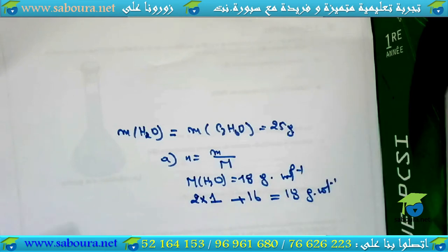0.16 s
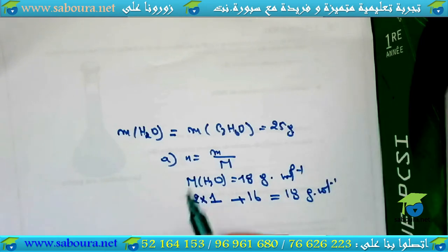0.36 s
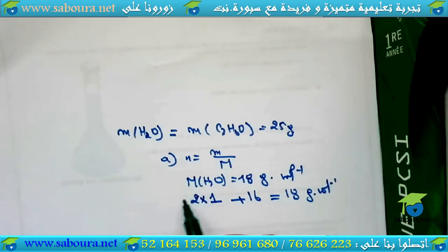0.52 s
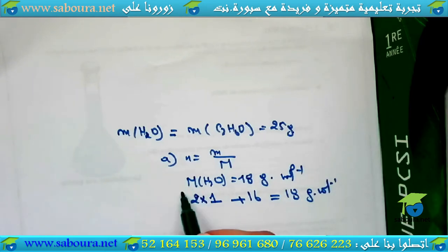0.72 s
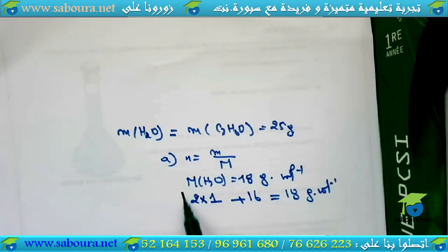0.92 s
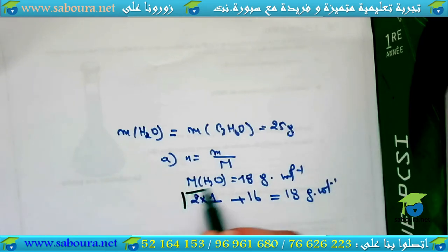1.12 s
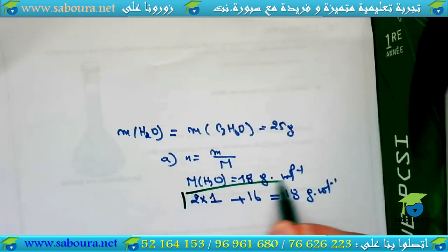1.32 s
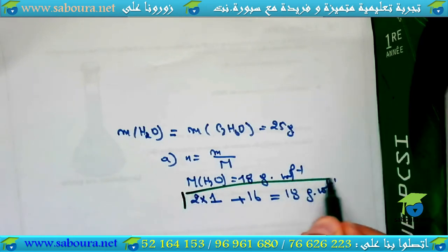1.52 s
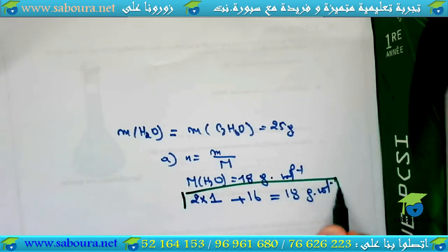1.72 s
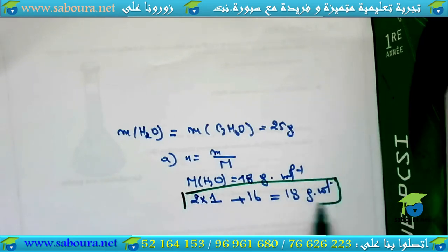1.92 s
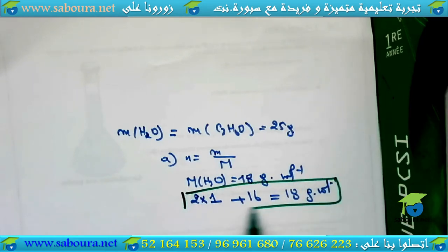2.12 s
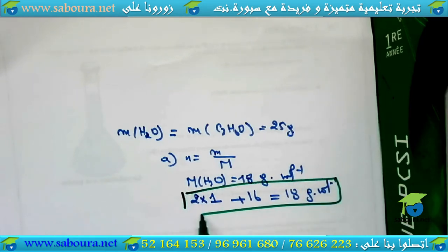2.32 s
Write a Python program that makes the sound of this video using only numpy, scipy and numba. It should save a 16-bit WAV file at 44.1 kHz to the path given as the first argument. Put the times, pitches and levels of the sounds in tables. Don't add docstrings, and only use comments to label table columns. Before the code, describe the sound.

A felt-tip marker draws on paper, heard close and nearly mono. A dull hand brush opens, then tiny ticks at 0.24 to 0.56 s. The tip lands at 0.63, makes a faint short stroke around 0.8, and ticks again. A long dry, gritty scratch runs 1.05 to 1.55, a faint corner scrape follows near 1.7, then the loudest bright scrape from 1.87 to 2.3. Soft desk thuds, low rumble and faint hiss lie beneath.

```python
import sys
import numpy as np
from scipy import signal
from scipy.fft import rfft, irfft
from scipy.io import wavfile
from scipy.ndimage import uniform_filter1d
from numba import njit

SR = 44100
rng = np.random.default_rng(int(sys.argv[2]) if len(sys.argv) > 2 else 0)


def digitize_waveform(pressure):
    field = np.atleast_2d(pressure).T
    bounded = np.clip(field, -1, 1)
    quanta = np.round(bounded * 32767).astype(np.int16)
    wavfile.write(sys.argv[1], SR, quanta)


def linear_from_db(decibels):
    return 10 ** (np.asarray(decibels, float) / 20)


N = 103767
RUMBLE_DB = -61.5

# time_s, level_db
DRAG = [
    [(0, -51.5), (.03, -55.5), (.064, -55), (.086, -72), (.11, -70)],
    [(.615, -89), (.63, -53.5), (.642, -51), (.664, -54), (.685, -79)],
    [(.725, -91), (.742, -62.5), (.792, -52.5), (.832, -56), (.855, -74), (.89, -74), (1.02, -83)],
    [(1.03, -66), (1.094, -43.5), (1.18, -40.5), (1.3, -39.5), (1.436, -41.5), (1.55, -53.5), (1.585, -83)],
    [(1.38, -77), (1.46, -62.5), (1.55, -58), (1.59, -82)],
    [(1.63, -93), (1.654, -63.5), (1.716, -53), (1.83, -56.5), (1.87, -61)],
    [(1.83, -77), (1.87, -55.5), (1.895, -51.5), (1.93, -69)],
    [(1.825, -72), (1.861, -46.5), (1.931, -35), (2.065, -35.5), (2.241, -38.5), (2.293, -48), (2.305, -55),
     (2.35, -68.5)],
]
# freq_hz, level_db
TOUCH = [
    [(71, -32), (120, 16.5), (533, -7), (721, -4.5), (1170, -15), (2840, -10), (11200, -6), (14800, -13.5)],
    [(1500, -50), (2500, -21.5), (2900, 2.5), (4100, -5), (4800, -28), (8800, -15.5), (10500, -21.5),
     (12500, -16), (14800, -28)],
    [(700, -9), (1100, -10.5), (2400, -15), (3000, -7.5), (5900, -23.5), (8500, 4.5), (10500, -16.5),
     (12700, -4), (14800, -27)],
]
# freq_hz, level_db
GRIP = [
    [(350, -64), (600, -23), (1620, -18), (1980, -8), (2680, -7.5), (5930, -10), (7720, 1.5), (14200, 1)],
    [(410, -41), (700, 2.5), (2190, -6), (3560, 1.5), (4230, -16), (6000, 3.5), (7800, -35), (13200, -120)],
    [(900, -11.5), (2600, -22), (3100, -0.5), (3700, -3.5), (4200, -7), (4800, -9.5), (9000, -7.5),
     (11500, -1.5), (14200, 0)],
    [(1470, -67), (2500, -32), (3370, 1.5), (3990, -14), (6500, -3), (8450, -32), (14300, -120)],
    [(350, -77), (600, -28.5), (2000, -17), (2380, -20.5), (3400, -17), (6250, -8), (7330, -0.5),
     (14200, -1.5)],
]


def marker():
    t = np.arange(N) / SR
    scrape = barrel(fibre_grit())
    scrape = scrape + sheet(scrape)
    out = np.zeros(N)
    for drag, grip in zip(DRAG, TOUCH + GRIP):
        time_s, level_db = np.transpose(drag)
        on = (t >= time_s[0]) & (t <= time_s[-1])
        tone = colour(scrape, grip)
        out += on * linear_from_db(np.interp(t, time_s, level_db)) * tone / np.std(tone[on])
    return spots(out)


def fibre_grit():
    fibres_per_s, spread_db = 30000, 2.0
    slip_fast_db, slip_slow_db = 0.53, 0.35
    sizes = linear_from_db(spread_db * np.minimum(rng.exponential(1, N), 4)) * rng.standard_normal(N)
    plucked = rng.random(N) < fibres_per_s / SR
    return sizes * plucked * linear_from_db(slip_fast_db * drift(380) + slip_slow_db * drift(36))


# freq_hz, width_hz, level_db over the scrape
BARREL = [(1127, 146, 8), (1513, 184, 8), (2005, 250, 12), (3400, 435, 9.5), (5120, 630, 6),
          (6685, 116, 10), (8450, 340, -1.5), (10840, 330, 0), (11670, 220, -7), (12960, 150, -10)]


def barrel(grit):
    patchy_db = 3.5
    paper_width_hz, paper_db, paper_swing_db, paper_shifts_per_s = 244, 1, 5, 6.5
    out = grit.copy()
    for hz, width, db in BARREL:
        out += linear_from_db(db + patchy_db * drift(2.37)) * resonance(grit, hz, width)
    for hz in np.linspace(900, 14000, 36) * rng.uniform(.97, 1.03, 36):
        level = linear_from_db(paper_db + paper_swing_db * drift(paper_shifts_per_s))
        out += level * resonance(grit, hz, paper_width_hz)
    return out


# time_s, freq_hz, level_db over the scrape
SHEET = [(1.05, 6700, -18), (1.151, 7260, 10.5), (1.2, 7830, 11), (1.25, 9600, 4), (1.32, 9500, 2),
         (1.4, 8240, -2.5), (1.8, 6800, -36), (1.921, 10040, 9.5), (2.0, 9550, 2), (2.08, 9400, 6),
         (2.13, 7540, 8.5), (2.201, 7680, 9.5), (2.301, 6400, 1)]
# time_s, freq_hz, level_db over the scrape
FLAP = [(1.04, 4030, 2), (1.12, 4000, 6.5), (1.3, 6260, 3), (1.45, 5330, 9), (1.87, 4760, -10),
        (1.947, 5460, 10), (2.02, 4950, -8), (2.12, 3400, -7.5), (2.248, 2760, 12)]


def sheet(scrape):
    return travelling(scrape, SHEET, 1000) + travelling(scrape, FLAP, 910)


def travelling(x, rows, width):
    t = np.arange(N) / SR
    time_s, hz, db = np.transpose(rows)
    cosine = np.cos(2 * np.pi * np.interp(t, time_s, hz) / SR)
    r = np.exp(-np.pi * width / SR)
    return linear_from_db(np.interp(t, time_s, db, left=-40)) * glide(x, cosine, r)


@njit
def glide(x, cosine, r):
    y = np.zeros(len(x))
    gain = (1 - r * r) / 2
    for i in range(2, len(x)):
        y[i] = gain * (x[i] - x[i - 2]) + 2 * r * cosine[i] * y[i - 1] - r * r * y[i - 2]
    return y


# start_s, end_s, freq_hz, level_db
SPOTS = [(-1, 0.098, 2780, 6), (0.5, 0.05, 7800, 5.5), (0, 0.051, 11400, 6.5), (0.5, .08, 1230, -3),
         (0.5, 0.11, 6800, -5), (-0.5, 0.09, 8600, -7), (0.7, .86, 1050, 5.5), (.73, .86, 1890, 4.5),
         (0.2, .86, 2900, 5), (0.5, 1.1, 3700, -5), (1.2, .86, 2530, -6), (1.5, .85, 12600, 3.5),
         (1.8, 1.58, 1840, 3.5), (1.1, 1.3, 3430, 3.5), (0.9, 1.16, 4300, 3), (0.9, 1.58, 2600, -5),
         (2.5, 1.58, 4000, -12), (1.7, 1.58, 3440, 2.5), (1.14, 1.4, 5060, 4), (1.06, 1.25, 5850, -2),
         (1.55, 1.45, 6650, 3.5), (1.3, 1.4, 8400, 3.5), (1.5, 1.8, 7600, -3), (2.1, 1.87, 3230, 4.5),
         (0.5, 1.87, 3900, -13), (1.5, 1.85, 4950, 6), (0, 1.87, 5740, -10), (1.8, 1.87, 6600, 6),
         (1.8, 1.77, 11600, 5), (3, 1.82, 12100, 3), (2.3, 2.4, 12400, 6.5), (1, 2.1, 12000, -4),
         (3.05, 2.04, 10100, 5), (2.6, 1.7, 11050, 6), (1.89, 2.0, 7800, 3.5), (2.4, 2.1, 5070, -7.5),
         (2.04, 2.3, 10100, 3.5), (2.5, 2.26, 9170, 3), (2, 2, 7370, 4.5), (2.5, 2.27, 8550, 4),
         (1, 2.27, 8100, -6.5), (1.5, 2.2, 13700, 5), (1.5, 2, 11000, 8), (2.0, 2.1, 3440, 2.5),
         (0.5, 2.08, 12300, -8)]


def spots(x):
    width_hz, fade_s = 305, 0.027
    t, out = np.arange(N) / SR, x.copy()
    for start, end, hz, db in SPOTS:
        near = np.clip(np.minimum(t - start, end - t) / fade_s + .5, 0, 1)
        out += near * (linear_from_db(db) - 1) * resonance(x, hz, width_hz * (hz / 4000) ** .5)
    return out


# start_s, peak_db, ring_hz, t60_s
TICKS = [
    (0.2374, -44, 3300, 0.0053),
    (0.403, -61.5, 3470, 0.013),
    (0.4243, -61.5, 3340, 0.018),
    (0.4847, -55, 2850, 0.0082),
    (0.5602, -52.5, 3180, 0.0087),
    (0.873, -59, 3600, 0.012),
    (0.9467, -59, 3340, 0.0079),
    (0.9808, -54.5, 3430, 0.022),
    (1.0238, -54.5, 2920, 0.017),
]
CRACK_DB = [2.5, -2, 0, -12, -32, 1, -9, -14, -22]


def ticks():
    t, out = np.arange(N) / SR, np.zeros(N)
    crack_colour = [(600, -7), (1000, -2.0), (1800, -13), (3300, -4), (6500, -9.0), (14300, -1)]
    bright = colour(rng.standard_normal(N), crack_colour)
    scuff = rms_one(resonance(rng.standard_normal(N), 2300, 1100))
    for (s, db, hz, t60), crack_db in zip(TICKS, CRACK_DB):
        for spread in (-0.095, 0, 0.095):
            out += ring(s, db - 5, hz * (1 + spread), t60)
        out += ring(s, db + crack_db - 5, 4900, t60)
        out += (t > s) * linear_from_db(db + crack_db - 60 * np.abs(t - s) / 0.012) * bright
        out += (t > s - t60 / 3) * linear_from_db(db - 17 - 60 * np.abs(t - s) / (2.5 * t60)) * scuff
    return out


# start_s, peak_db, freq_hz, t60_s
BUMPS = [
    (.002, -48.5, 201, 0.088),
    (.01, -58, 289.6, 0.18),
    (.96, -58, 256, .1),
    (.78, -57.5, 104.5, .5),
    (.88, -55, 104.3, 0.43),
    (1.01, -51.5, 108, 0.087),
    (1.76, -59, 146, 1),
    (1.879, -51.5, 99.7, 0.7),
    (1.939, -52, 146, 0.63),
]


def bumps():
    return sum(ring(*row) for row in BUMPS)


# freq_hz, level_db
ROOM = [(12, -44), (20, 7.5), (52, -4), (166, -13), (198, -10.5), (433, -19), (900, -26), (1170, -30.5),
        (1980, -120)]
# freq_hz, width_hz, level_db over the rumble
ROOM_MODES = [(45, 13.4, 3.5), (101, 49, 7), (146, 13.5, 1.5), (196.2, 7.1, 1)]
# time_s, level_db
SWELL = [(0, -1.5), (.9, 0.5), (1.6, -0.5), (1.9, 3), (2.35, 3)]


def room():
    white = rng.standard_normal(N)
    low = white.copy()
    for hz, width, db in ROOM_MODES:
        low += linear_from_db(db + 5.8 * drift(4.55)) * resonance(white, hz, width)
    swell_db = np.interp(np.arange(N) / SR, *np.transpose(SWELL))
    return linear_from_db(RUMBLE_DB + swell_db) * rms_one(colour(low, ROOM))


# freq_hz, level_db
HISS = [(290, 18.5), (500, -20.5), (600, -8), (1050, 7.5), (2370, 2.5), (3260, 4), (10300, -0.5),
        (14200, 0.5)]


def hiss():
    hiss_db, swing_db, patchy_db = -69.5, 0.9, 2
    flat = colour(rng.standard_normal(N), HISS)
    edges = np.geomspace(250, 16000, 10)
    together = swing_db * drift(2.8)
    out = np.zeros(N)
    for lo, hi in zip(edges, edges[1:]):
        out += linear_from_db(together + patchy_db * drift(5.1)) * band(flat, lo, hi)
    return linear_from_db(hiss_db) * rms_one(out)


# low_hz, high_hz, level_db, rarity
SIDE_BANDS = [(200, 800, -40, -.5), (2200, 4600, -12, 1.5), (4800, 6000, -2, .7), (6000, 7600, -3, .2),
              (7600, 9000, -6, -.3)]


def side_traces(mid):
    rarer_per_db = .045
    loud_db = 10 * np.log10(uniform_filter1d(mid ** 2, size=2048) + 1e-12) + 60
    scrambled, side = mid * rng.choice([-1, 1], N), 0
    for lo_hz, hi_hz, db, rarity in SIDE_BANDS:
        is_open = drift(9) > rarity + rarer_per_db * loud_db
        gate = uniform_filter1d(1. * is_open, size=600)
        source = scrambled if hi_hz > 2000 else rng.standard_normal(N) * linear_from_db(RUMBLE_DB + 20)
        side = side + linear_from_db(db) * band(band(gate * source, lo_hz, hi_hz), lo_hz, hi_hz)
    return side


def rms_one(x):
    return x / np.sqrt(np.mean(x ** 2) + 1e-20)


def drift(rate):
    r = np.exp(-16 * np.pi * rate / SR)
    slow = signal.lfilter([1], [1, -2 * r, r * r], rng.standard_normal(N // 8 + 8002))
    slow = slow[8000:]
    return np.interp(np.arange(N) / 8, np.arange(len(slow)), rms_one(slow - slow.mean()))


def colour(x, points):
    hz, db = np.transpose(points)
    grid = np.maximum(np.arange(N // 2 + 1) * SR / N, 1)
    right = db[-1] if hz[-1] > 12000 else -80
    gain_db = np.interp(np.log(grid), np.log(hz), db, left=-80, right=right)
    return irfft(rfft(x) * linear_from_db(gain_db), N)


def resonance(x, hz, width):
    r = np.exp(-np.pi * width / SR)
    poles = [1, -2 * r * np.cos(2 * np.pi * hz / SR), r * r]
    return signal.lfilter([(1 - r * r) / 2, 0, (r * r - 1) / 2], poles, x)


def ring(s, db, hz, t60):
    t = np.maximum(np.arange(N) / SR - s, 0)
    return linear_from_db(db - 60 * t / t60) * np.sin(2 * np.pi * hz * t)


def band(x, lo_hz, hi_hz):
    return signal.sosfilt(signal.butter(4, [lo_hz, hi_hz], "band", fs=SR, output="sos"), x)


def scene():
    mid = marker() + ticks() + bumps() + room() + hiss()
    side = side_traces(mid)
    return np.array([mid + side, mid - side])


def band_limit(x):
    return signal.sosfilt(signal.butter(12, 15470, fs=SR, output="sos"), x)


def record(dry):
    cutoff_hz, leak_db = 14260, -72
    grid = np.arange(N // 2 + 1) * SR / N
    cut = irfft(rfft(dry) * np.where(grid < cutoff_hz, 1, linear_from_db(leak_db)), N)
    return band_limit(cut)


dry = scene()
out = record(dry)
digitize_waveform(out)
```